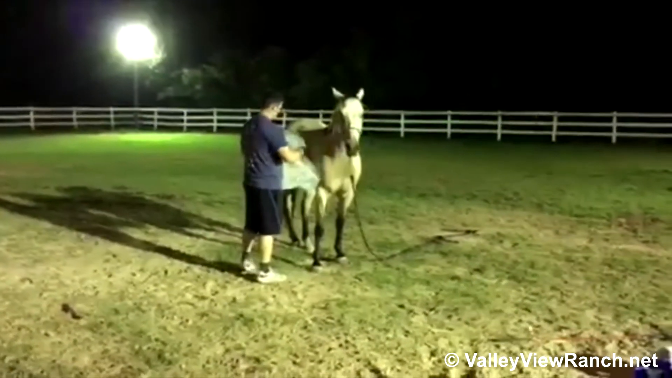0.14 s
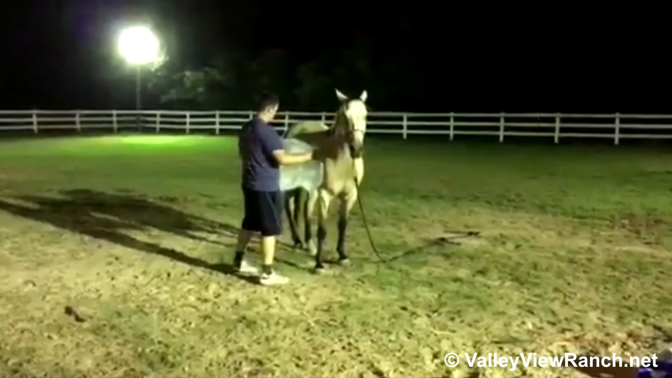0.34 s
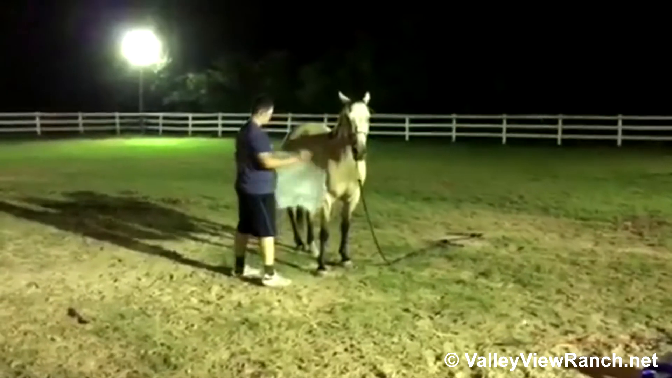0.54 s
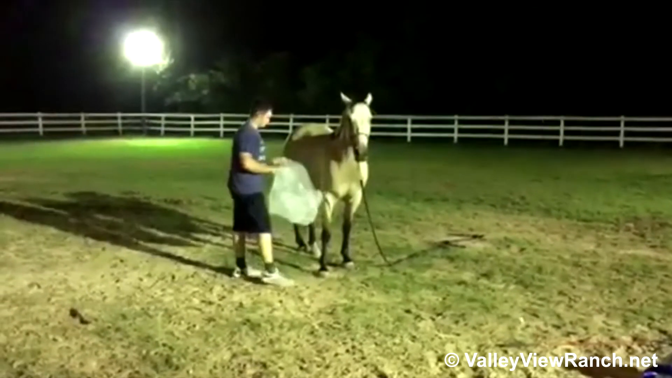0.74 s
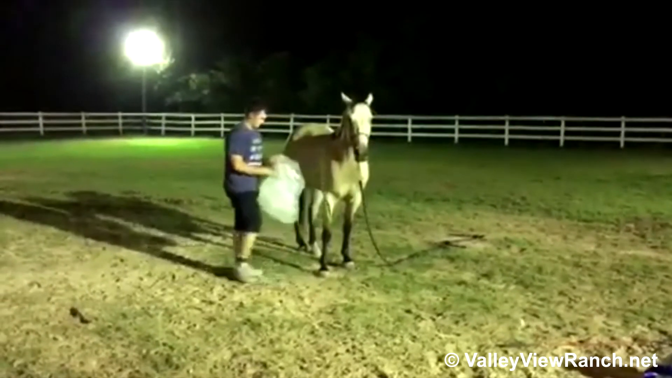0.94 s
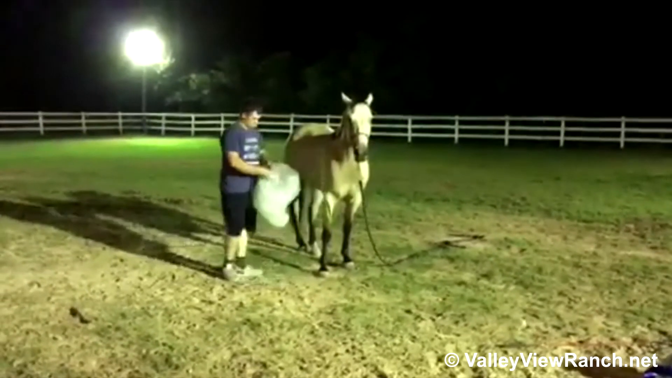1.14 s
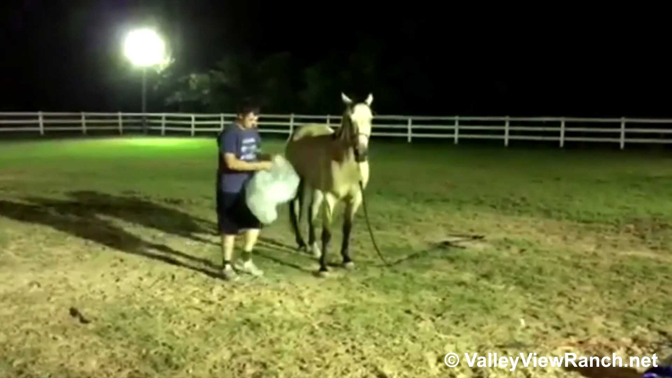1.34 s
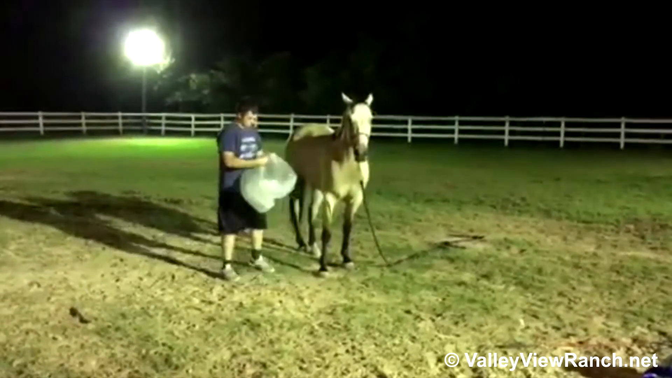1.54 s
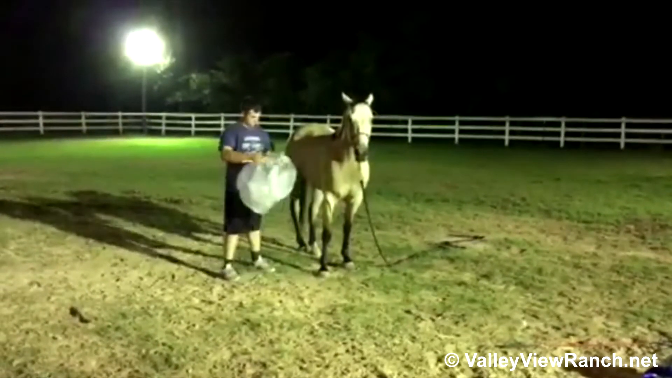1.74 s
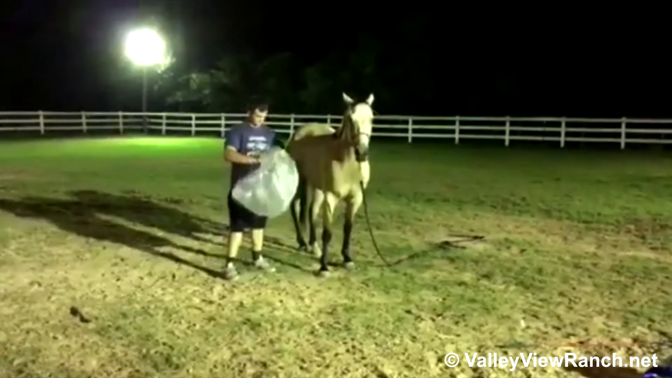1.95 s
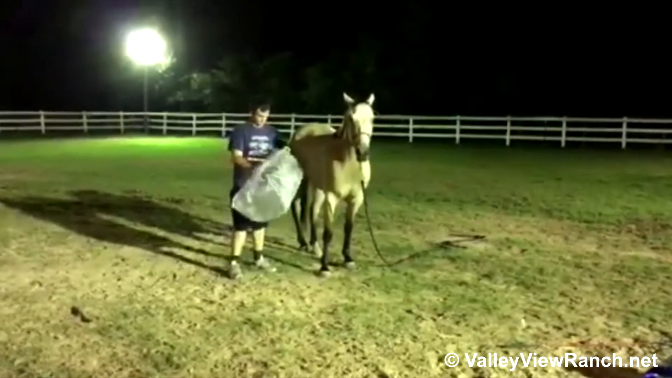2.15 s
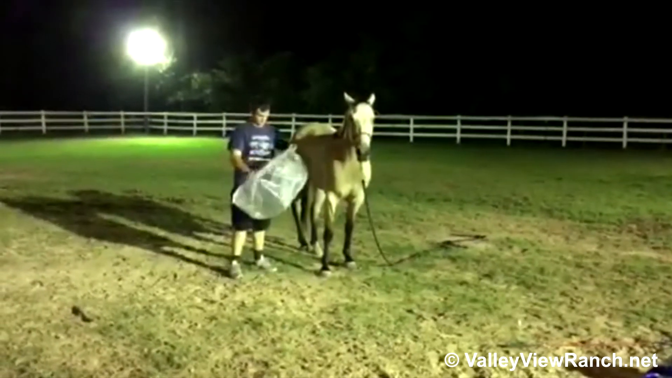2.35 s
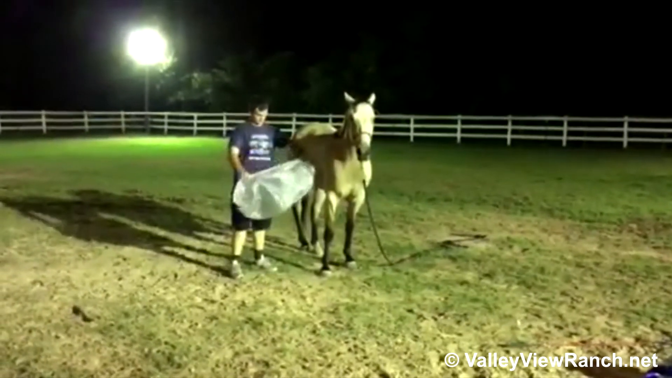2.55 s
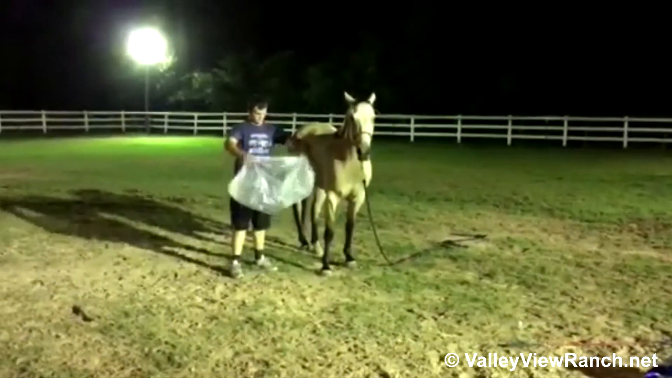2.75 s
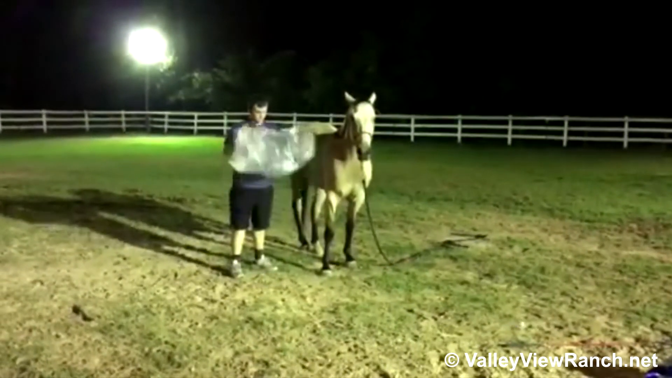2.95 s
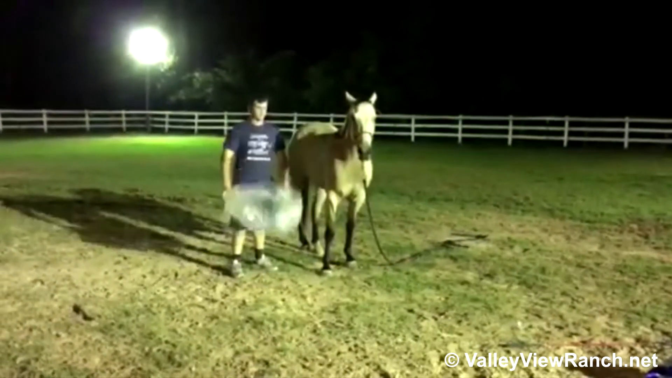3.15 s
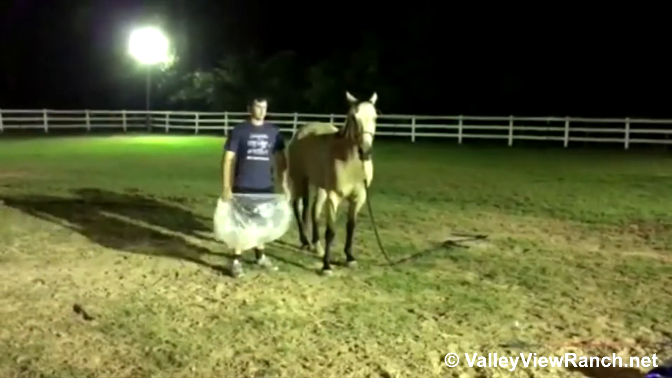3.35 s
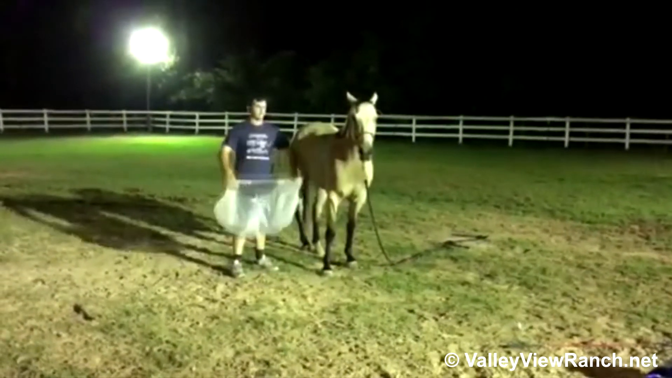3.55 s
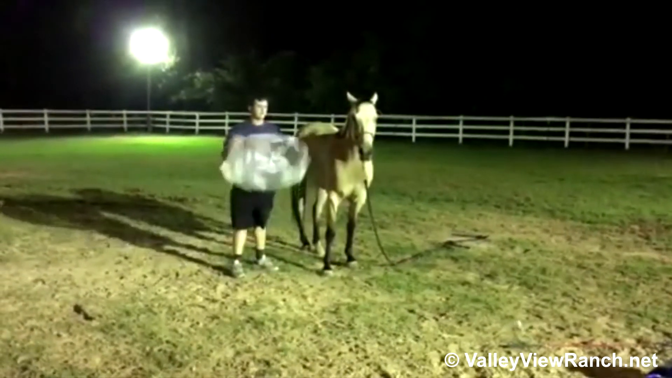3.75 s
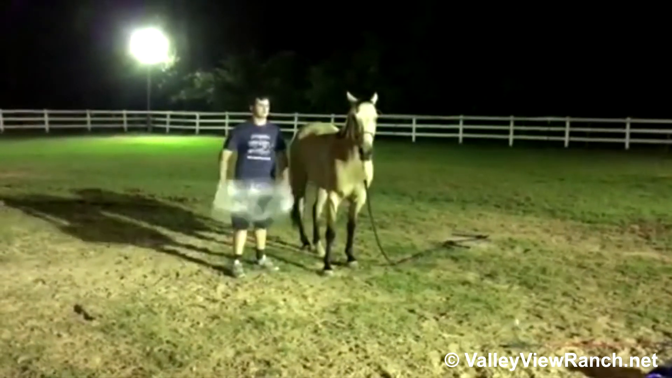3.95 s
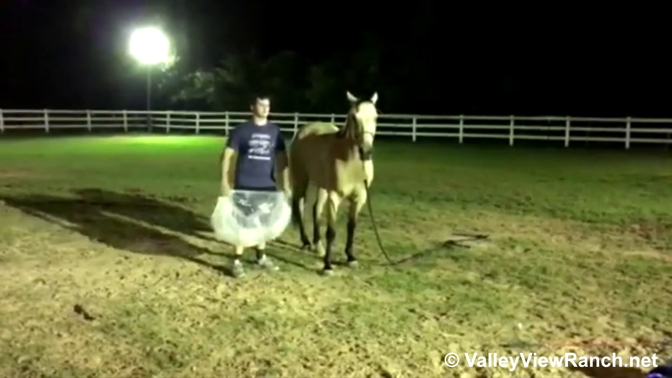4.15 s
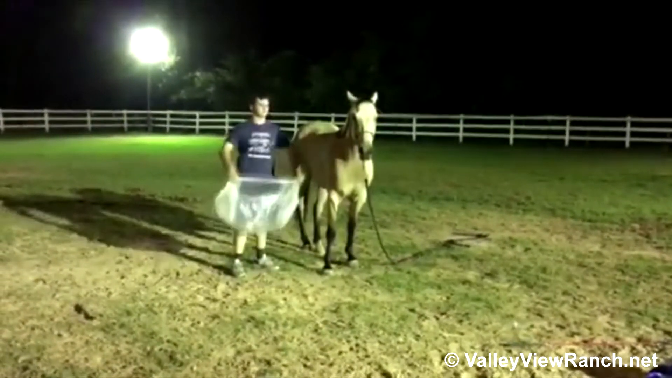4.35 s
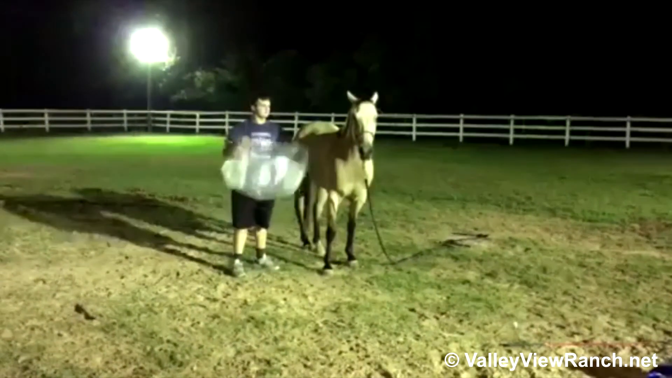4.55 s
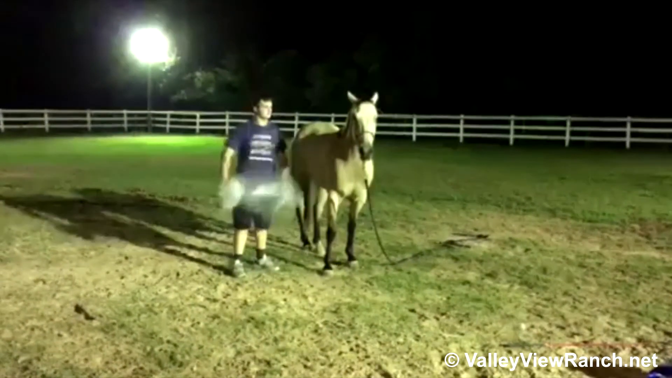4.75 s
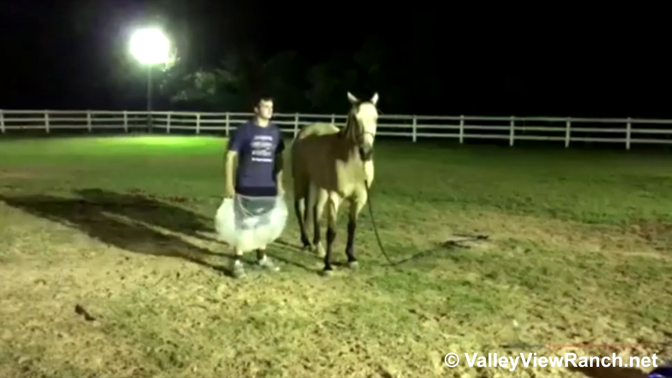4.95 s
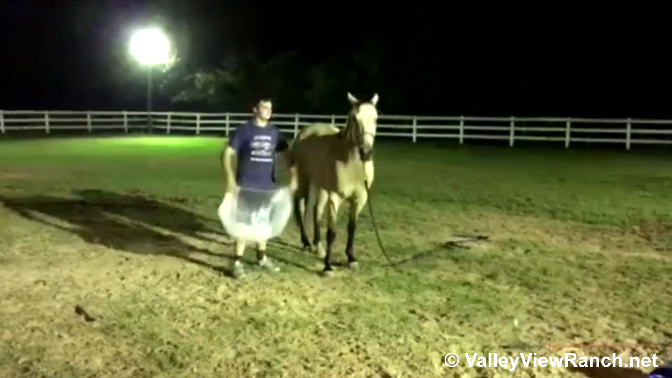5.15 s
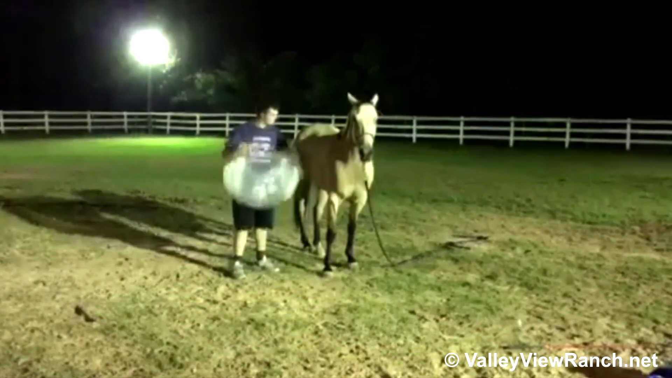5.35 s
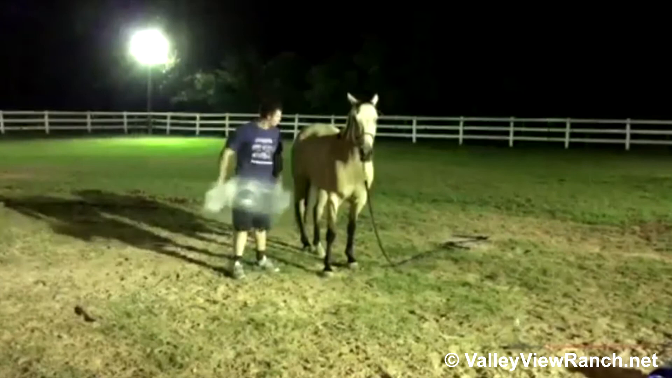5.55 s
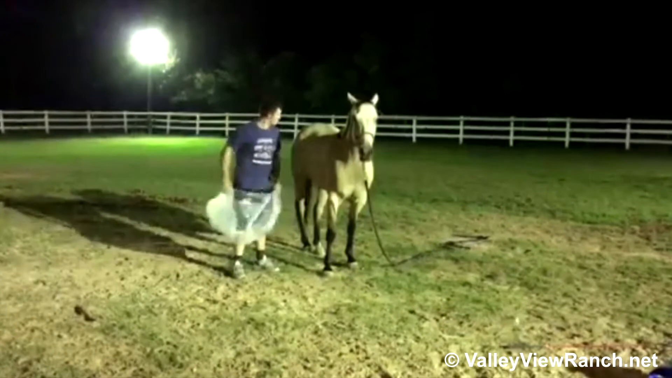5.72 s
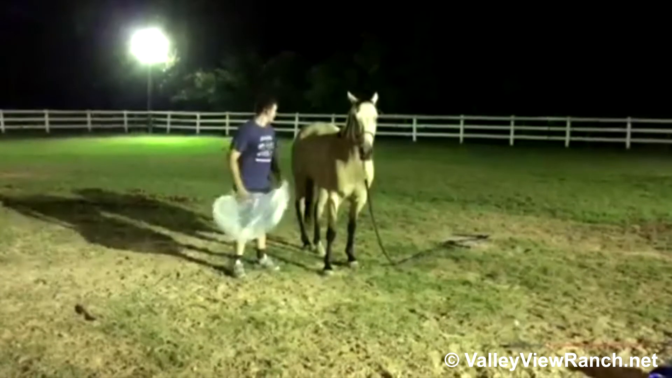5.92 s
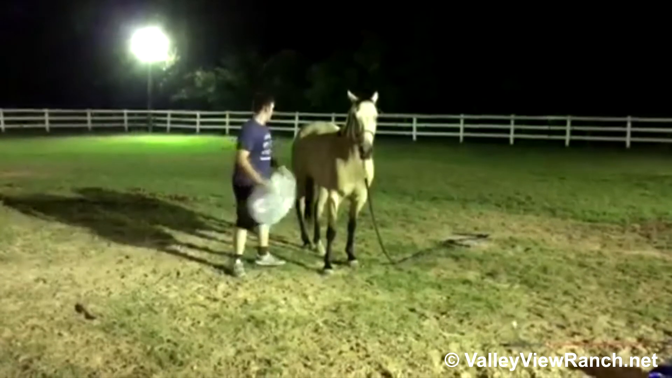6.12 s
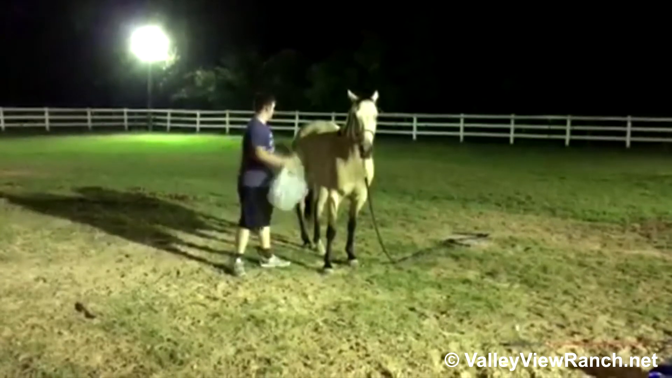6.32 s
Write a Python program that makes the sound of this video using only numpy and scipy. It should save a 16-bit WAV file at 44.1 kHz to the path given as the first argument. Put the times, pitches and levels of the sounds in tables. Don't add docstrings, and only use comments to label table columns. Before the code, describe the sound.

An open paddock at night, heard through a small microphone some metres from the action. Throughout, distant insects sing in thin, finely pulsing high bands, swelling slightly, over a soft low rumble and faint hiss. From 0 to 3 seconds a large thin plastic bag is handled: irregular light crinkles, small ticks and folds giving way, clearer near 0.2, 0.9, 1.3 and 2.2 seconds. At about 3.15 it is flapped hard, a double crackling snap with ringing creases and a low puff, then a brief rustling swing. A second flap at 3.95 is broader and rushing, with a deep air thump. The third, at 4.8, is a longer cluster of snaps and heavy thumps, settling with a jerk near 5.0. The last, at 5.6, is the sharpest crack, dying quickly. Gentle crinkling and a bright tick near 6.1 lead to the end at 6.4.

```python
import sys
import numpy as np
from scipy import signal
from scipy.io import wavfile

SR = 44100
rng = np.random.default_rng(int(sys.argv[2]) if len(sys.argv) > 2 else 0)


def persist_wave(psi):
    counts = np.round(np.clip(psi, -1, 1) * 32767).astype(np.int16)
    wavfile.write(sys.argv[1], SR, np.atleast_2d(counts).T)


def volts_from_decibels(level):
    exponent = np.asarray(level, float) / 20
    return 10 ** exponent


N = 281358


def rms_one(x):
    return x / np.sqrt(np.mean(x ** 2) + 1e-20)


def in_time(rows):
    s, *columns = np.transpose(rows)
    return [np.interp(np.arange(N) / SR, s, c) for c in columns]


def at_hz(points, hz):
    point_hz, value = np.transpose(points)
    return np.interp(np.log(hz), np.log(point_hz), value)


def drift(rate_hz):
    every = 20
    r = np.exp(-2 * np.pi * rate_hz * every / SR)
    noise = rng.standard_normal(N // every + 2002)
    slow = signal.lfilter([1], [1, -2 * r, r * r], noise)[2000:]
    return np.interp(np.arange(N) / every, np.arange(len(slow)), rms_one(slow))


def resonate(x, hz, width_hz):
    r = np.exp(-np.pi * width_hz / SR)
    zeros = np.array([1, 0, -1]) * (1 - r * r) / 2
    return signal.lfilter(zeros, [1, -2 * r * np.cos(2 * np.pi * hz / SR), r * r], x)


# f/Hz, level/dB per Hz
NIGHT_SPECTRUM = [(22, -24), (40, -0.5), (76, 6), (140, -4.5), (230, -14), (460, -25), (665, -17.5),
                  (2400, -20.5), (4950, -24), (7700, -62), (10500, -39), (15000, -49)]
# t/s, level/dB
RUMBLE_SWELL = [(0.0, -51), (3.02, -52), (3.29, -48), (3.77, -54), (4.01, -52), (6.38, -49)]


def night():
    level_db = -46.5
    rumble_db, = in_time(RUMBLE_SWELL)
    edges = 24 * 2 ** np.arange(0, 9.6, .5)
    white = rng.standard_normal((2, N + SR))
    out = np.zeros(N)
    for k, (low, high) in enumerate(zip(edges, edges[1:])):
        band_pass = signal.butter(2, [low, high], "band", fs=SR, output="sos")
        band = signal.sosfilt(band_pass, white[k % 2])[SR:]
        swell_db = (rumble_db - rumble_db.mean()) * at_hz([(150, 0.94), (300, 0.77)], low)
        band_db = at_hz(NIGHT_SPECTRUM, np.sqrt(low * high))
        out += band * volts_from_decibels(band_db + swell_db + 0.92 * drift(5.6))
    return volts_from_decibels(level_db) * rms_one(out)


# f/Hz, width/Hz, level/dB
INSECT_BANDS = [
    (2942, 190, -6),
    (3219, 150, -1.5),
    (6490, 690, -2),
    (9350, 960, -2),
]
# t/s, lower singers' level/dB, upper singers' level/dB
INSECT_SWELL = [(0, -75, -59), (.6, -49, -53.5), (.9, -54.5, -55.5), (1.5, -55, -54.5), (2.03, -49, -57),
                (2.2, -57, -69), (2.4, -53, -52.5), (3.1, -54, -55), (3.7, -55, -56.5), (4.4, -52, -56),
                (5.3, -54, -55.5), (5.9, -55, -54), (6.38, -54, -54.5)]


def insects():
    lower_db, upper_db = in_time(INSECT_SWELL)
    swells = [lower_db, upper_db, -58.0, -58.0]
    out = np.zeros(N)
    for swell_db, (hz, width_hz, level_db) in zip(swells, INSECT_BANDS):
        song = rng.standard_normal(N)
        for _ in range(2):
            song = resonate(song, hz, width_hz * 1.34)
        pulsing_db = 0.75 * drift(3.4) + 1.6 * drift(90)
        out += rms_one(song) * volts_from_decibels(level_db + swell_db + pulsing_db)
    return out


# t/s, peak level/dB
TICKS = [(0.1094, -35), (0.1374, -31), (0.177, -24), (0.2129, -32), (0.347, -36), (0.8609, -31),
         (1.4262, -36), (1.4606, -46), (1.768, -28), (1.9091, -41), (2.7317, -38), (3.5347, -28),
         (3.7494, -38), (3.7793, -30), (4.1657, -25), (4.6194, -36), (5.1794, -45), (5.6145, -14),
         (6.0754, -35), (6.0816, -17)]


def ticks():
    sizes = volts_from_decibels(-62 + 3.0 * np.minimum(rng.exponential(1, N), 3))
    strikes = sizes * (rng.random(N) < 120.0 / SR)
    for s, peak_db in TICKS:
        strikes[round(s * SR)] += volts_from_decibels(peak_db - 6.0)
    fade = volts_from_decibels(-60 / (0.0054 * SR))
    puffs = signal.lfilter([1], [1, -fade], strikes) * rng.standard_normal(N)
    return signal.sosfilt(signal.butter(2, 4500, "high", fs=SR, output="sos"), puffs)


# t/s, peak level/dB, f/Hz, ring time/s
POPS = [(0.837, -29.5, 815, 0.025), (1.11, -36, 650, .025), (1.216, -35, 1290, 0.018),
        (1.334, -41, 880, 0.015), (2.568, -34, 2230, 0.02), (3.182, -5, 1200, 0.021),
        (3.304, -26, 961, 0.022), (3.369, -24, 1390, 0.02), (3.462, -29, 1450, 0.022),
        (3.545, -33, 1500, .02), (3.152, -12, 450, 0.038), (4.09, -29, 800, .025),
        (4.151, -29, 1170, 0.018), (4.2, -28, 1500, .02), (4.61, -36, 750, .025), (4.65, -37, 620, .025),
        (4.832, -5, 600, 0.026), (4.859, -8, 581, 0.017), (4.93, -29, 950, .025), (5.02, -23.5, 1600, .02),
        (5.614, 4, 550, 0.018), (5.709, -13.5, 900, 0.018), (5.722, -23, 1560, 0.018),
        (5.744, -20, 1050, 0.021)]


def pops():
    out = np.zeros(N + SR)
    t = np.arange(SR // 10) / SR
    chances = rng.random((len(POPS), 2))
    for (s, peak_db, hz, ring_s), (detune, turn) in zip(POPS, chances):
        second_hz = hz * (1.15 + .2 * detune)
        pair = np.sin(2 * np.pi * hz * t) + .5 * np.sin(2 * np.pi * (second_hz * t + turn))
        dying = volts_from_decibels(peak_db - 2.0 - 60 * t / max(ring_s, .004))
        out[round(s * SR):][:len(t)] += dying * (1 - np.exp(-t * hz)) * pair
    return out[:N]


def gesture(start, hold, level_db, rise, fall):
    t = np.arange(N) / SR - start
    return volts_from_decibels(level_db + rise * np.minimum(t, 0) - fall * np.maximum(t - hold, 0)) ** 2


WHIP_DB_PER_S = 471

# t/s, stirring level/dB
STIRRING = [(0, -57), (.6, -63.5), (1.2, -56.5), (2.0, -61), (2.6, -55), (3.6, -58), (4.5, -63.5),
            (5.35, -61), (5.9, -58.5), (6.38, -60)]
# t/s, grip lasts/s, level/dB, brightness/dB
GRIPS = [(0.0, 0.017, -35, -1.5), (0.077, 0.14, -46.5, 0.1), (0.36, 0.01, -36.5, -2),
         (0.497, 0.017, -57, -9), (0.852, .085, -51, -1), (1.103, 0.12, -51, -1.5),
         (1.308, 0.038, -44.5, -2), (1.45, .03, -52.5, 2), (1.607, 0.022, -52, -2),
         (1.74, 0.057, -46.5, 3.5), (1.9, 0.018, -57.5, 4), (2.161, 0.026, -41, -3),
         (2.23, 0.078, -51, -1.5), (2.445, .03, -52.5, 5), (2.576, .02, -55, 10), (2.7, .06, -48, 3.5),
         (2.88, .03, -53, 0.1), (3.458, 0.018, -45.5, -8), (3.547, .03, -51.5, -3), (3.717, 0.096, -51, -3),
         (4.33, 0.035, -50.5, -3), (4.598, 0.027, -53, -8), (5.17, 0.025, -49, 0.1), (5.81, 0.074, -48, -1),
         (5.943, .02, -50.5, -3), (6.08, 0.048, -44, 3.5), (6.166, .2, -52, -3)]
# crest begins t/s, crest lasts/s, crest level/dB, wind-up level/dB re crest
FLAPS = [
    (3.15, .04, -25, -19),
    (3.954, 0.054, -21.5, -18),
    (4.792, 0.063, -22.5, -16),
    (5.59, .06, -28.5, -12.5),
]
# settles until t/s, settling level/dB, last jerk/dB re settling, billowing level/dB
SETTLES = [
    (3.39, -41, 0, -45.5),
    (4.22, -41, -4.5, -45),
    (5.04, -42, 1.5, -47),
    (5.75, -34, -4.5, -44),
]
# sheen/dB, fizz/dB, air push/dB
CREST = (-9.5, -19, -6)
WIND = (0, -16, -12)
SWING = (-6.5, -22, -13.5)
RECOIL = (-6, -20, -9)
GRIP = (-4.5, -19, -10)
HANG = (-1, -13, -5)


def motion():
    rest, recoil_s = 228, 0.035
    parts = [(volts_from_decibels(in_time(STIRRING)[0]) ** 2, HANG)]
    for s, hold, level_db, bright in GRIPS:
        colour = np.add(GRIP, [bright, .7 * bright, 0])
        parts.append((gesture(s, hold, level_db, rise=268, fall=185), colour))
    for (s, hold, crest_db, wind_db), (until, settle_db, jerk_db, _) in zip(FLAPS, SETTLES):
        crest = gesture(s, hold, crest_db, WHIP_DB_PER_S, fall=476)
        wind_up = gesture(s, 0, crest_db + wind_db, rise=128, fall=170)
        time_left = np.clip(until - np.arange(N) / SR, 0, until - s)
        sag = volts_from_decibels(20 * time_left) ** 2
        swing = sag * gesture(s, until - s, settle_db, WHIP_DB_PER_S, rest)
        recoil = gesture(until - recoil_s, recoil_s, settle_db + jerk_db, rest, rest)
        parts += [(crest, CREST), (wind_up, WIND), (swing, SWING), (recoil, RECOIL)]
    total = sum(power for power, _ in parts)
    sheen_db, fizz_db, air_db = sum(np.outer(colour, power) for power, colour in parts) / total
    rustle_db = 10 * np.log10(total)
    return rustle_db, sheen_db, fizz_db, rustle_db + air_db


def billow():
    power = np.zeros(N)
    for (s, *_), (until, *_, level_db) in zip(FLAPS, SETTLES):
        power += gesture(s, until - s, level_db, WHIP_DB_PER_S, fall=85)
    band = signal.butter(4, [100, 370], "band", fs=SR, output="sos")
    air = rms_one(signal.sosfilt(band, rng.standard_normal(N)))
    return air * np.sqrt(power) * volts_from_decibels(2.8 * drift(15))


# t/s, peak level/dB, f/Hz, cycles to peak
THUMPS = [(3.134, -18.5, 91, .6), (3.15, -17.5, 113, 1.3), (3.170, -16.5, 173, 1.3),
          (3.198, -21, 120, 0.29), (3.369, -25, 256, 0.78), (3.967, -8.5, 127, 0.41),
          (3.978, -17, 120, 0.53), (3.990, -15, 125, 0.47), (4.006, -18, 130, 0.4),
          (4.805, -5.5, 113, 0.38), (4.832, -7, 155, 0.49), (4.847, -19, 153, 0.57),
          (5.015, -27, 255, 0.88), (5.6124, -13, 307, 0.69), (5.6164, -2.5, 152, 0.42),
          (5.631, -18.5, 141, 0.67)]


def thumps():
    out = np.zeros(N + SR)
    t = np.arange(SR // 10) / SR
    for s, peak_db, hz, cycles in THUMPS:
        age = t * hz / cycles
        swell = age ** 2 * np.exp(2 - 2 * age)
        out[round(s * SR):][:len(t)] -= volts_from_decibels(peak_db) * swell * np.sin(2 * np.pi * hz * t)
    return out[:N]


def creases(pitches, per_s, spread_db, sharp):
    sizes = volts_from_decibels(spread_db * np.minimum(rng.exponential(1, N), 4.5)) * rng.choice([-1, 1], N)
    chance = per_s * volts_from_decibels(2.2 * drift(60)) / SR
    clicks = rms_one(sizes * (rng.random(N) < chance))
    dealt = rng.integers(0, 6, N)
    tracks = []
    for k, hz in enumerate(pitches):
        ringing = resonate(clicks * (dealt == k % 6) + 1e-18, hz, hz / sharp)
        tracks.append(rms_one(ringing) * np.sqrt(hz))
    return tracks


# t/s, peak level/dB
SNAPS = [(3.1173, -13), (3.1492, -18), (3.167, 2), (3.1734, -10), (3.1806, 2.5), (3.238, -19),
         (3.3702, -13), (3.9406, -8), (3.9664, -15), (3.9804, -21), (3.9884, -10.5), (4.0024, -13),
         (4.079, -16), (4.151, -17.5), (4.195, -19.5), (4.774, -11), (4.804, -0.5), (4.832, 0), (4.845, -6),
         (4.983, -18.5), (5.024, -12), (5.5563, -17), (5.5874, -27), (5.5982, -24), (5.6135, 8),
         (5.6306, -10), (5.7224, -23), (5.7594, -20)]
# t/s, peak level/dB
FOLDS = [(0.011, -27), (0.1354, -21), (0.18, -21), (0.2123, -21), (0.3654, -32), (0.5107, -28),
         (0.861, -19.5), (0.9453, -30), (1.0494, -28), (1.16, -25), (1.3274, -21), (1.4277, -32),
         (1.911, -28), (2.15, -17.5), (2.1694, -20), (2.2907, -26), (2.7765, -24), (3.5337, -22),
         (3.651, -25), (4.6937, -27), (4.7334, -32), (5.9459, -23), (6.0753, -18), (6.0962, -20)]


def snap_power():
    body, top = np.zeros(N + SR), np.zeros(N + SR)
    t = np.arange(SR // 10) / SR
    bursts = [(s, db, -23, 0.032 + .0006 * db) for s, db in SNAPS]
    bursts += [(s, db, -19, .027) for s, db in FOLDS]
    for s, peak_db, top_db, dying_s in bursts:
        swell = 1 - np.exp(-t / 0.0011)
        shape = swell * volts_from_decibels(-40 * t / max(dying_s, .003)) * volts_from_decibels(peak_db - 4.5)
        at = round(s * SR)
        body[at:at + len(t)] += shape ** 2
        top[at:at + len(t)] += (shape * volts_from_decibels(top_db + 7)) ** 2
    return body[:N], top[:N]


# f/Hz, level/dB per Hz
FILM_SPECTRUM = [(200, -3.5), (400, -3.5), (800, 0.5), (1500, 0.5), (2600, -2.5), (5000, -8.5), (9000, -17),
                 (12000, -32), (15000, -31)]


def film():
    rustle_db, sheen_db, fizz_db, air_db = motion()
    body, top = snap_power()
    pitches = np.geomspace(200, 14800, 36)
    flutter_db = 1.68 * drift(26.5)
    out = np.zeros(N)
    for hz, track in zip(pitches, creases(pitches, per_s=9000.0, spread_db=4.0, sharp=8.5)):
        air_share = at_hz([(280, 0.87), (500, 1.0), (700, 0.086)], hz)
        sheen_share = at_hz([(2000, 0), (5000, 0.72), (8000, 1), (11500, 0.53)], hz)
        high = at_hz([(8000, 0.012), (11500, 1)], hz)
        shift_db = air_share * (air_db - rustle_db + 9.5)
        shift_db += sheen_share * (sheen_db + 2.5)
        shift_db += high * (fizz_db + 9.0)
        patch_db = 1.73 * drift(29)
        steady = volts_from_decibels(rustle_db + shift_db + flutter_db + patch_db)
        snapped = at_hz([(300, 0.078), (900, 0.049)], hz) * ((1 - high) * body + high * top)
        out += volts_from_decibels(at_hz(FILM_SPECTRUM, hz) - 42) * track * np.sqrt(steady ** 2 + snapped)
    return out


def scene():
    echo_s, echo_gain = 0.00316, 0.14
    bag = film() + pops() + ticks()
    lag = round(echo_s * SR)
    bag[lag:] += echo_gain * signal.lfilter([.4], [1, -.6], bag)[:-lag]
    return (bag + thumps() + insects() + night() + billow())[None]


def top_cut(x):
    return signal.sosfilt(signal.butter(12, 15850, fs=SR, output="sos"), x)


def record(dry):
    x = signal.sosfilt(signal.butter(4, 42, "high", fs=SR, output="sos"), dry)
    rounded = 1.8 * np.tanh(x / 1.8)
    mix = signal.sosfilt(signal.cheby1(8, 1, 15100, fs=SR, output="sos"), rounded)
    return top_cut(mix)


dry = scene()
out = record(dry)
persist_wave(out)
```